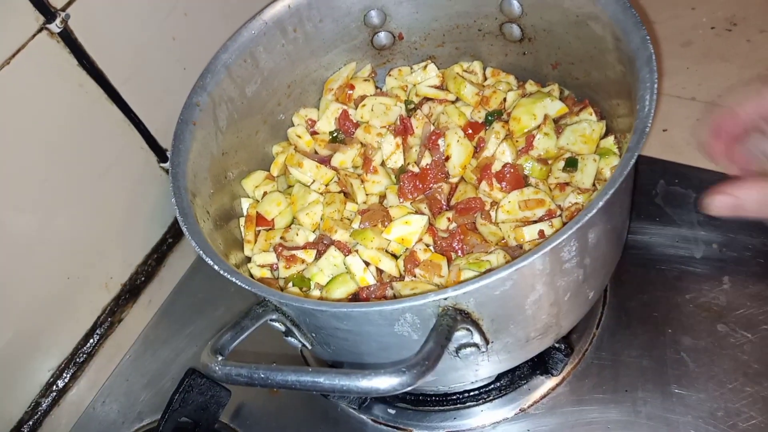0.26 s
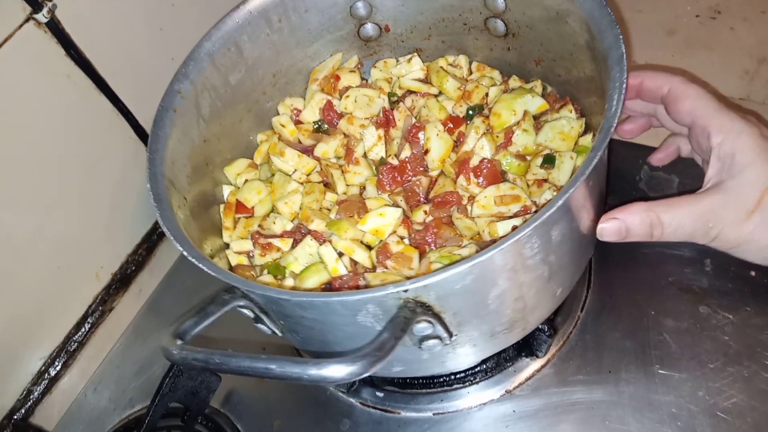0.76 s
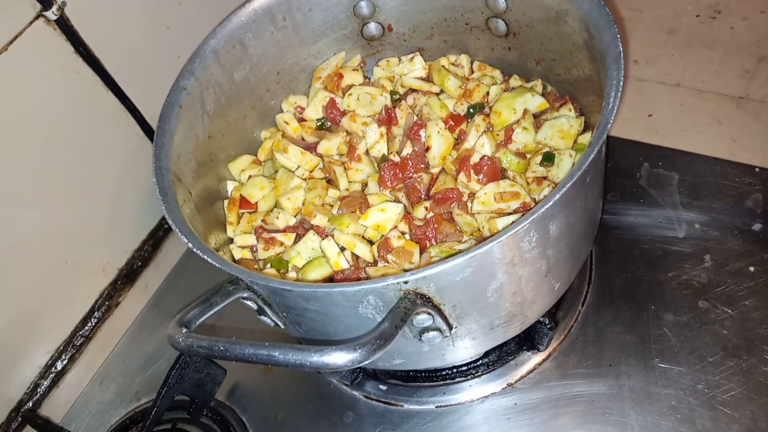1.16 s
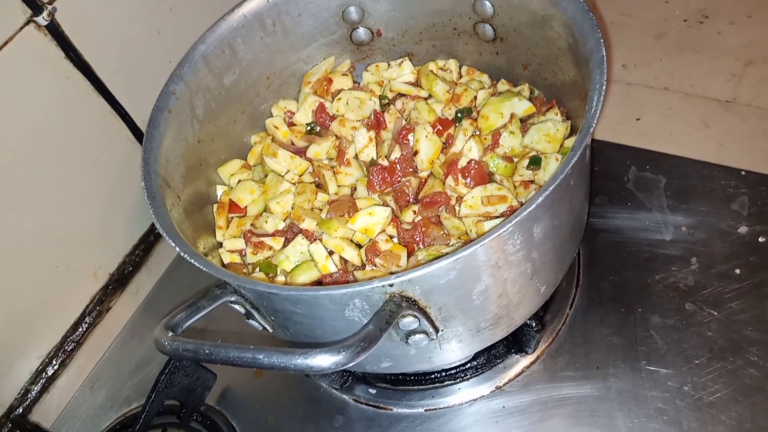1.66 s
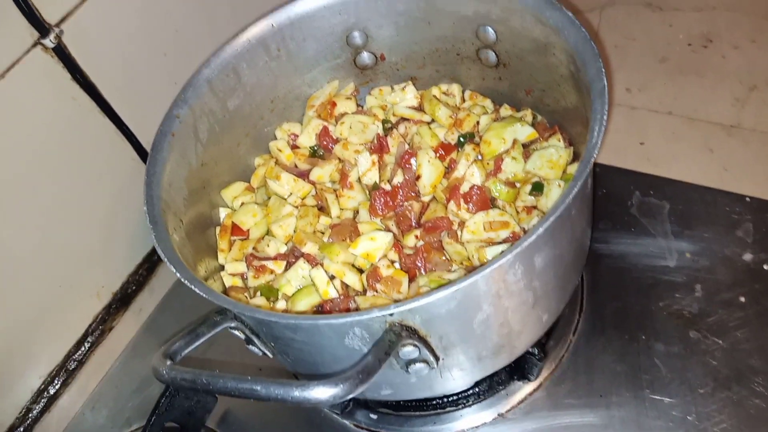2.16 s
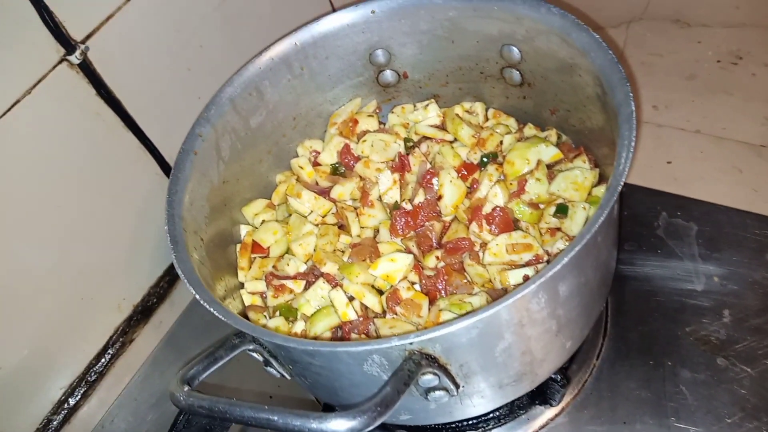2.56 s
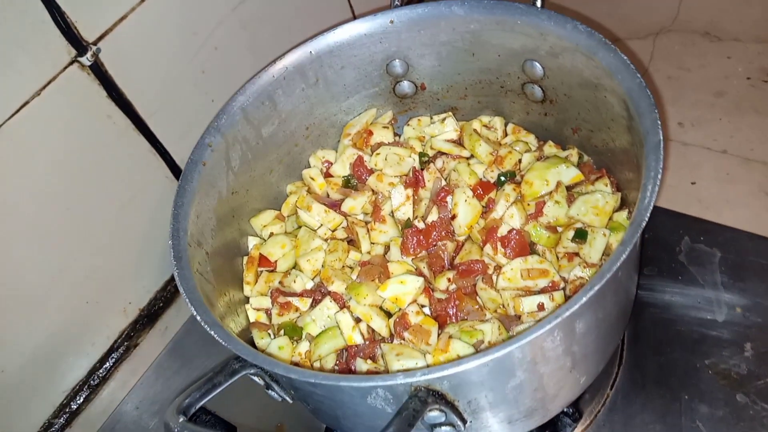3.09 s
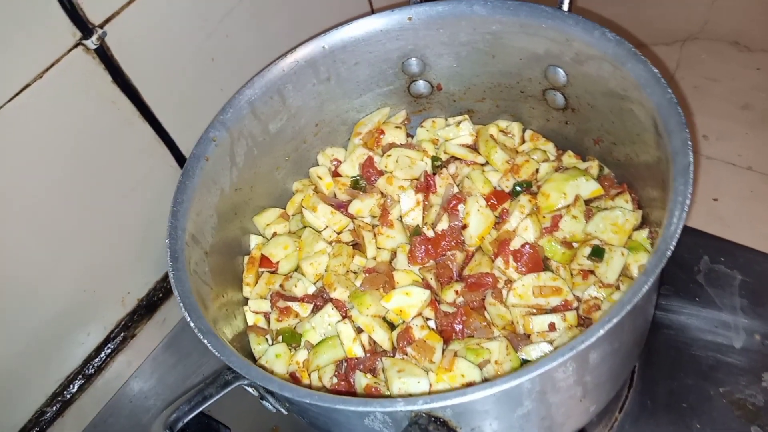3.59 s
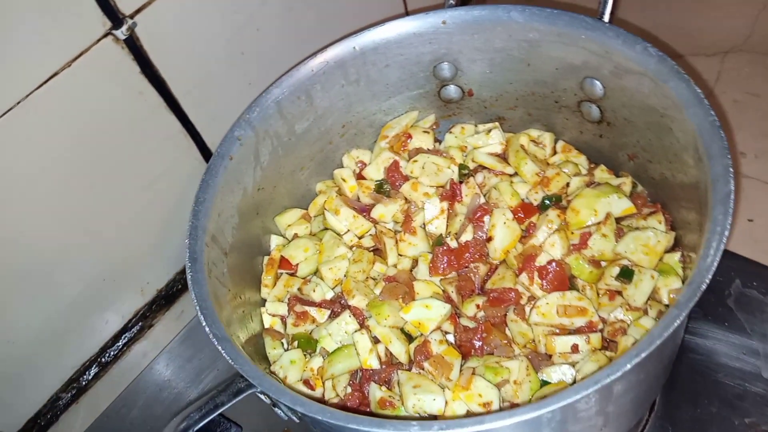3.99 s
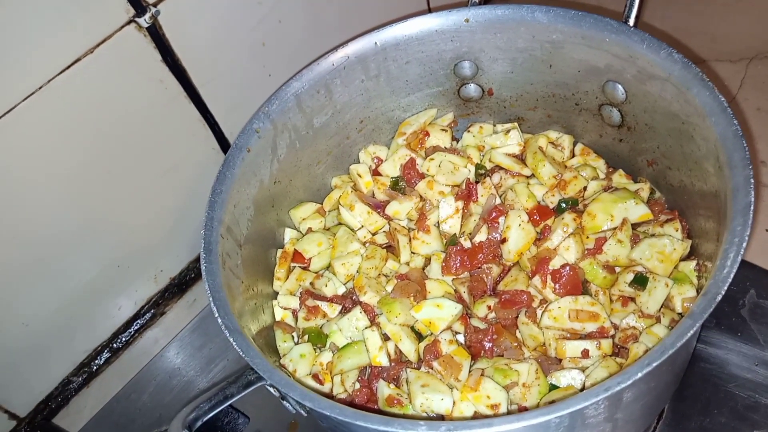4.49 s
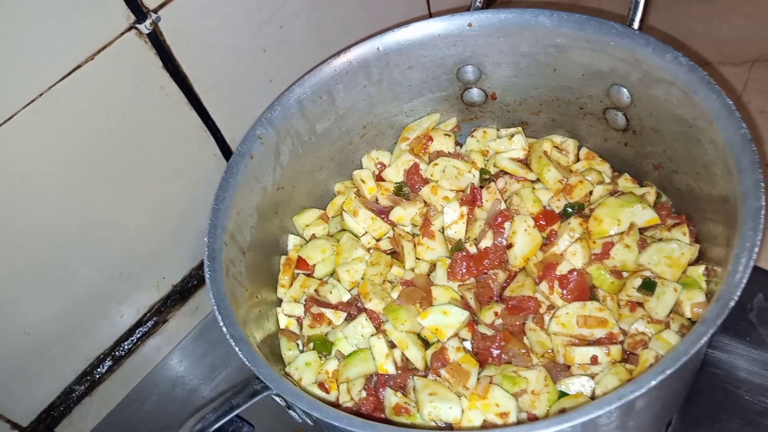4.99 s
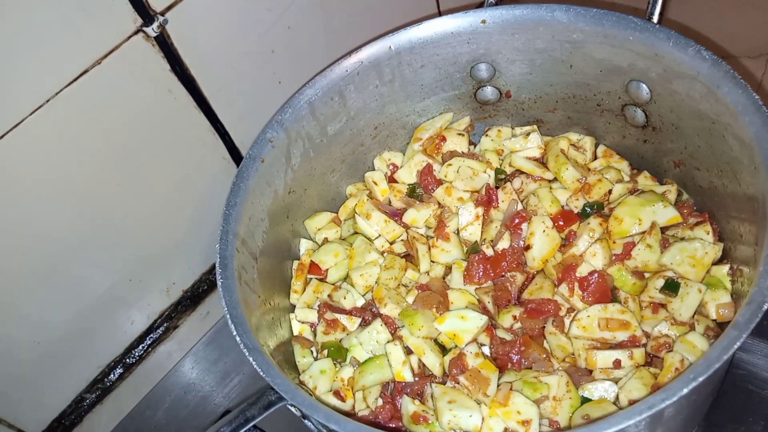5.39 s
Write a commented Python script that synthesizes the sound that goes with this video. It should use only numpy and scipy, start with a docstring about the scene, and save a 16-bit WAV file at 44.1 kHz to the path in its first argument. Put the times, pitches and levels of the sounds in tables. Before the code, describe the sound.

A faint, fine sizzle from vegetables cooking in a metal pot, with close handling adding light ticks, dull knocks and brief metallic scrapes.

```python
"""Chopped vegetables sizzle faintly in a metal pot over a low gas flame.
Countless tiny steam bursts superpose into a fine hiss and excite the air modes of the open pot.
There is one brief squeak; later a faint tone swells. Close by, handling adds dull rustles, a low rumble,
ticks, soft bumps, drags of skin and short rubs that leave the metal ringing.
One microphone, with a thin hiss of its own, feeds both channels."""
import sys
import numpy as np
from scipy.fft import rfft, irfft, next_fast_len
from scipy.io import wavfile

SR = 44100
rng = np.random.default_rng(int(sys.argv[2]) if len(sys.argv) > 2 else 0)


def inscribe(sig):
    """Save sig as 16-bit PCM at rate SR to the path in sys.argv[1].

    A 1-D sig is mono; a 2-D sig holds one channel per row.
    Samples are clipped to [-1, 1] before scaling.
    """
    pcm = np.round(np.clip(np.atleast_2d(sig).T, -1, 1) * 32767)
    wavfile.write(sys.argv[1], SR, pcm.astype(np.int16))


N = 249144
TIME = np.arange(N) / SR
SIZE = next_fast_len(N)
FREQS = np.maximum(np.fft.rfftfreq(SIZE, 1 / SR), 1)

# spectrum of steam bursts heard through the food: frequency_hz, gain_db
BURST_SPECTRUM = [(450, -30), (700, -12.5), (950, -8.5), (1200, -5), (1750, -4.5), (2300, -3.5),
                  (2800, -0.5), (3600, 1.5), (4900, -2), (5900, -3), (7000, -8), (7900, -13.5), (9300, -11),
                  (11500, -16), (14000, -22)]
# upper modes of the handled body: pitch_hz, width_hz, gain_db
KNOCK_MODES = [(322, 28, 12), (388, 28, 10.5), (650, 180, -1)]


def from_db(db):
    """Decibels to amplitude ratio."""
    return 10 ** (np.asarray(db) / 20)


def rms_one(x):
    """Normalisation to unit power."""
    return x / np.sqrt(np.mean(x ** 2) + 1e-20)


def drift(rate_hz):
    """Random fluctuation: noise low-passed at rate_hz, with a spread near 1."""
    rolloff = 1 + (np.fft.rfftfreq(4096, 1 / 400) / rate_hz) ** 2
    slow = irfft(rfft(rng.standard_normal(4096)) / rolloff)
    return np.interp(TIME, np.arange(4096) / 400, rms_one(slow))


def colour(points):
    """Spectral envelope through (frequency_hz, gain_db) points."""
    hz, db = np.transpose(points)
    return from_db(np.interp(np.log(FREQS), np.log(hz), db))


def resonances(modes):
    """Response of damped resonators (pitch_hz, width_hz, gain_db) whose powers add."""
    return np.sqrt(sum(from_db(db) ** 2 / (1 + ((FREQS ** 2 - hz ** 2) / (FREQS * width)) ** 2)
                       for hz, width, db in modes))


def shaped(x, gain):
    """Linear filtering by a gain per frequency; rms 1."""
    return rms_one(irfft(rfft(x, SIZE) * gain, SIZE)[:N])


def noise(gain):
    """Filtered Gaussian noise; rms 1."""
    return shaped(rng.standard_normal(N), gain)


def tone(hz, wander_hz, rate_hz=45):
    """Oscillation with random frequency modulation; rms 1."""
    return np.sqrt(2) * np.sin(2 * np.pi * np.cumsum(hz + wander_hz * drift(rate_hz)) / SR)


def grains(per_s, spread_db):
    """Shot noise: impulses at random moments; spread_db makes a few of them larger."""
    sizes = from_db(spread_db * np.minimum(rng.exponential(1, N), 5)) * rng.choice([-1, 1], N)
    return sizes * (rng.random(N) < per_s / SR)


def swell(middle_s, spread_s):
    """Gaussian envelope."""
    return np.exp(-.5 * ((TIME - middle_s) / spread_s) ** 2)


def blow(start_s, t60_s, rise_s):
    """Envelope of a damped vibration: a quick rise, then exponential decay."""
    age = np.maximum(TIME - start_s, 0)
    return (1 - np.exp(-age / rise_s)) * from_db(-60 * age / t60_s)


def power_sum(envelopes):
    """Incoherent addition: the squares of the amplitudes add."""
    return np.sqrt(sum(envelope ** 2 for envelope in envelopes))


def reflected(x, sway=0.0405):
    """Comb filtering: near echoes interfere, their delays wandering as the microphone moves; rms 1."""
    # first reflections from pot wall, stove and tiles: delay_s, gain_db
    paths = [(.0019, -14.5), (.0034, -17), (.0052, -16), (.0081, -18), (0.0125, -22.5), (.019, -22.5)]
    echoes = 0
    for delay, db in paths:
        departure = TIME - delay * (1 + sway * drift(0.195))
        echoes += from_db(db) * np.interp(departure, TIME, x, left=0)
    return rms_one(x + echoes)


def sizzle(vigour_db, tilt_db, bursts_per_band_s=9000, sputter_db=0.26, patchy_db=0.67):
    """Superposition of steam bursts: each size fills its own band at an unsteady level; rms 1."""
    edges_hz = np.geomspace(400, 16000, 13)
    spectrum, sputter, bursts = colour(BURST_SPECTRUM), drift(9.4), 0
    for low, high in zip(edges_hz, edges_hz[1:]):
        band = spectrum * (FREQS >= low) * (FREQS < high)
        octaves = np.log2(low / 3700)
        follow = np.clip(1 - 0.55 * octaves ** 2, .3, 1)  # middle sizes follow the heat most closely
        trend_db = follow * vigour_db + tilt_db * np.clip(octaves, -1, 1)
        activity = from_db(trend_db + sputter_db * sputter + patchy_db * drift(13.0))
        pops = shaped(grains(bursts_per_band_s, spread_db=2.0), band)
        bursts += np.sqrt(np.sum(band ** 2)) * activity * pops
    return reflected(bursts)


def crackle(level_db=-64):
    """Sparse shot noise: bursts near the surface stand out as fine, sharp pricks."""
    return from_db(level_db) * shaped(grains(per_s=260, spread_db=0.5), colour(BURST_SPECTRUM))


def pot_air(vigour_db, level_db=-59, follow=0.57, wander=.012, waver_db=1.5):
    """Cavity resonance: bursts ring the air in the pot; rising steam makes pitch and strength waver."""
    # air modes of the open pot: pitch_hz, width_hz, gain_db
    air_modes = [(526, 14, -7), (627, 10, -1.5), (673, 8.6, -3), (863, 99, -6.5), (1074, 49, 5),
                 (1471, 33, -2.5), (1950, 89, -6), (2483, 100, -0.5), (2850, 67, -5.5), (3610, 340, -6.5)]
    response = resonances(air_modes) / (1 + (450 / FREQS) ** 4)
    air = shaped(grains(per_s=1500, spread_db=2.5), response)
    warped_time = TIME + np.cumsum(wander * drift(9)) / SR
    strength = from_db(level_db + follow * vigour_db + waver_db * drift(3.6))
    return strength * np.interp(warped_time, TIME, air)


def flame(level_db=-73, flutter_db=2.0):
    """Combustion noise: a low, slightly unsteady rush of burning gas."""
    # spectrum of the flame: frequency_hz, gain_db
    flame_spectrum = [(20, -26), (42, -16), (65, 0.5), (90, 3.5), (118, -3.5), (148, 2), (200, -4.5),
                      (270, -8.5), (340, -2), (460, -7), (800, -11.5), (2000, -21)]
    return from_db(level_db + flutter_db * drift(5.9)) * noise(colour(flame_spectrum))


def rustles(light_db=-73.5, hollow_hz=545, width_hz=70):
    """Muffled friction noise: a light touch sounds hollow, a harder one excites the knock modes."""
    # sliding touches: middle_s, relative_db, spread_s
    touches = [(0.303, -78, 0.23), (0.998, -76, 0.028), (1.317, -76, 0.19), (1.957, -74, 0.05),
               (2.51, -74, 0.028), (2.768, -72, 0.043), (3.13, -73, .035), (3.69, -61.5, 0.17),
               (4.065, -72, 0.11), (4.332, -67.5, 0.065), (4.531, -65.5, 0.029), (5.338, -64.5, 0.029),
               (5.55, -56.5, 0.078)]
    # spectrum of their friction: frequency_hz, gain_db
    dull_spectrum = [(120, -25), (260, -14), (330, 5), (430, 2.5), (510, -3), (620, 2.5), (850, -2),
                     (1300, -10.5), (2500, -39)]
    dull = noise(colour(dull_spectrum))
    knock = noise(resonances(KNOCK_MODES) / (1 + (FREQS / 800) ** 4))
    hollow = noise(resonances([(hollow_hz, width_hz, 0)]) ** 2)
    out = 0
    for middle, db, spread in touches:
        force_db = db - light_db
        ringing = from_db(3 - 0.93 * force_db) * hollow + from_db(-11 + 0.53 * force_db) * knock
        out += from_db(db) * swell(middle, spread) * (dull + ringing)
    return out


def pushes(rumble_hz=76, width_hz=67):
    """Slow forcing stirs only the lowest resonance, heard as a rumble."""
    # slow pushes: middle_s, level_db, spread_s
    presses = [(0.68, -73, 0.044), (2.6, -73, .04), (2.72, -67.5, 0.045), (3.24, -65.5, 0.032),
               (4.77, -64, .014)]
    force = sum(from_db(db) * swell(middle, spread) for middle, db, spread in presses)
    return force * noise(resonances([(rumble_hz, width_hz, 0)]) ** 2)


def ticks(rise_share=0.047):
    """Damped transients: each light contact is a short band of noise around its own pitch."""
    # light contacts: start_s, level_db, pitch_hz, width_hz, t60_s
    contacts = [(0.6875, -44, 9000, 15000, .014), (0.7335, -35, 5940, 2200, .026),
                (0.741, -46, 6500, 4500, 0.067), (0.796, -41, 15300, 2200, .03),
                (1.035, -40, 4800, 2500, .034), (2.729, -53.5, 540, 420, 0.11),
                (3.11, -51, 11000, 5000, .07), (3.148, -48.5, 1550, 1000, 0.15)]
    out = 0
    for start, db, hz, width, t60 in contacts:
        envelope = from_db(db) * blow(start, t60, rise_share * t60)
        out += envelope * noise(resonances([(hz, width, 0)]) ** 2)
    return out


def bumps(gain_db=5.5, rise_s=0.012, t60_s=0.24, soft_hz=650, rattle_db=-5):
    """Impact excitation: soft contacts ring the body's modes; the hand's padding keeps the treble out."""
    # soft contacts: start_s, relative_db, knock_over_thud_db
    impacts = [(0.738, -60, 4), (0.764, -62, 8.5), (0.79, -70, 18.5), (0.828, -66, 8), (0.872, -74, 14),
               (1.465, -67, -20), (2.722, -67.5, 8), (2.765, -65, -11), (2.82, -63, -12), (2.99, -67, -26),
               (3.16, -67.5, 3), (3.225, -72, -1), (4.205, -64.5, 1), (4.235, -63, -5), (4.76, -71, -2.5)]
    # low modes of the bumped body: pitch_hz, width_hz, gain_db
    thud_modes = [(80, 95, -6), (148, 45, 0), (225, 70, -28)]
    soft = 1 / (1 + (FREQS / soft_hz) ** 4) / (1 + (45 / FREQS) ** 4)
    thud_envelope = sum(from_db(db) * blow(start, t60_s, rise_s) for start, db, _ in impacts)
    knock_envelope = power_sum(from_db(db + knock_db) * blow(start, t60_s, rise_s)
                               for start, db, knock_db in impacts)
    ring = rms_one(sum(from_db(db) * tone(hz, wander_hz=22, rate_hz=20.6) for hz, _, db in KNOCK_MODES))
    rattle = from_db(rattle_db) * noise(soft * resonances(KNOCK_MODES))
    thud = noise(soft * resonances(thud_modes))
    return from_db(gain_db) * (thud_envelope * thud + knock_envelope * rms_one(ring + rattle))


def drags(catch_db=1.5, catch_hz=25, stop_s=.02):
    """Stick-slip friction: skin scuffs the body in uneven catches and stops at once on letting go."""
    # drags of skin: start_s, end_s, level_db, rise_s
    slides = [(0.905, 1.045, -66, .02), (3.12, 3.288, -69, .03), (5.382, 5.6, -61.5, 0.056)]
    # spectrum of the scuffing: frequency_hz, gain_db
    scuff_spectrum = [(35, -18), (70, -3), (150, 0.5), (230, -.5), (350, 0), (470, -8), (650, -5),
                      (1100, -24), (2500, -40)]
    force = 0
    for start, end, db, rise in slides:
        build = np.clip((TIME - start) / rise, 0, 1)
        release = np.clip((end - TIME) / stop_s + .5, 0, 1)
        force += from_db(db) * build * release
    return force * from_db(catch_db * drift(catch_hz)) * noise(colour(scuff_spectrum))


def faint_tones():
    """Modulated tones: one brief squeak; later a faint tone swells near the pot's 1470 Hz air mode."""
    # short tones: middle_s, level_db, spread_s, pitch_hz
    tone_swells = [(2.063, -57, 0.023, 2070), (2.997, -65, .06, 1476)]
    return sum(from_db(db) * swell(middle, spread) * tone(hz, wander_hz=24)
               for middle, db, spread, hz in tone_swells)


def rubs(chatter_db=1.5, rasp_db=-9, shimmer_db=-3, linger_db=-10, linger_t60_s=3.6):
    """Friction-induced vibration: tiny slips hiss and make the metal sing; its high modes linger."""
    # dry rubs: middle_s, ring_db, hiss_db, spread_s
    strokes = [(3.153, -57, -60, .02), (4.513, -58, -57.5, 0.014), (4.73, -57, -54, 0.02),
               (4.87, -65, -61, 0.03), (4.965, -68, -64, 0.0074), (5.093, -64, -63, .01),
               (5.418, -45, -56, 0.0071), (5.445, -40, -58, 0.015), (5.485, -45.5, -58, 0.0079),
               (5.545, -69.5, -59, 0.07)]
    # modes of the rubbed metal: pitch_hz, wander_hz, gain_db
    metal_modes = [(1650, 21.2, -10), (2330, 23, -8), (2680, 35, -9), (3030, 32.3, 1.5), (3880, 32, 3.5),
                   (4040, 45, -3.5), (4740, 30, -5), (5270, 47, -17), (5650, 30.4, -7), (11200, 50, -20),
                   (14630, 55, -13), (15150, 200, -18), (15700, 45, -14)]
    # thin high rings: pitch_hz, width_hz, stroke_gain_db, tail_gain_db
    high_modes = [(4750, 38, 5, 4), (5300, 50, 9, -5), (5650, 130, 1, 11), (7840, 40, 2, -13),
                  (9130, 60, 2, -15), (9700, 45, 1, -8), (10500, 350, -10, -2), (11200, 150, -5, -5),
                  (14650, 70, 0, -13), (15600, 70, 6, -9)]
    # spectrum of the friction hiss: frequency_hz, gain_db
    slip_spectrum = [(1000, -4.5), (2500, 1), (5500, 0), (7200, 12), (8200, -13), (9200, -2.5),
                     (11500, -2.5), (13700, -7), (15200, 3), (16000, -14)]
    slips = grains(per_s=3000, spread_db=0)
    shimmer = shaped(slips, resonances([(hz, width, db) for hz, width, db, _ in high_modes]))
    tail = noise(resonances([(hz, width, db) for hz, width, _, db in high_modes]))
    partials = sum(from_db(db + chatter_db * drift(90)) * tone(hz, wander)
                   for hz, wander, db in metal_modes)
    rasp = shaped(slips, resonances([(hz, 220, db) for hz, _, db in metal_modes]))
    singing = rms_one(rms_one(partials) + from_db(rasp_db) * rasp)
    friction = shaped(slips, colour(slip_spectrum)) + from_db(shimmer_db) * shimmer
    ring_envelope = power_sum(from_db(db) * swell(middle, spread) for middle, db, _, spread in strokes)
    hiss_envelope = power_sum(from_db(db) * swell(middle, spread) for middle, _, db, spread in strokes)
    tail_envelope = power_sum(from_db(db + linger_db) * blow(middle, linger_t60_s, rise_s=.01)
                              for middle, _, db, _ in strokes)
    return ring_envelope * singing + hiss_envelope * friction + tail_envelope * tail


def pings():
    """Free vibration: a light scrape leaves the metal ringing thinly."""
    # decaying partials: start_s, level_db, pitch_hz, t60_s
    thin_rings = [(4.73, -57.5, 4755, .7), (4.725, -63, 9050, .5)]
    return sum(from_db(db) * blow(start, t60, rise_s=.012) * tone(hz, wander_hz=14)
               for start, db, hz, t60 in thin_rings)


def scene(sizzle_gain_db=0.38):
    """Superposition of the cooking and the handling near it, alike in both channels."""
    # course of the slowly easing sizzle: time_s, relative_db, tilt_db_per_octave
    sizzle_course = [(0.0, -46.5, 2.5), (0.15, -47, 0.5), (1.07, -48.5, 1), (1.31, -50, 0.5),
                     (1.83, -48.5, 0), (2.14, -51, 0.5), (2.32, -50, 0.5), (4.78, -51.5, 0),
                     (5.17, -53, 0.5), (5.35, -49.5, 0.5)]
    time_s, *columns = np.transpose(sizzle_course)
    level_db, tilt_db = [np.interp(TIME, time_s, column) for column in columns]
    mean_db = np.mean(level_db)
    vigour_db = level_db - mean_db
    sizzling = from_db(mean_db + sizzle_gain_db) * sizzle(vigour_db, tilt_db)
    cooking = sizzling + crackle() + pot_air(vigour_db) + faint_tones() + flame()
    handling = bumps() + drags() + pushes() + rustles() + rubs() + pings() + ticks()
    return np.array([cooking + handling] * 2)


def record(dry, hiss_db=-59.5, waver_db=1.9, cutoff_hz=15760):
    """Self-noise and band limiting: the microphone adds a wavering hiss; the top is cut steeply."""
    # microphone hiss, topped by the resonance of its port: frequency_hz, gain_db
    hiss_spectrum = [(500, -22.5), (9000, -14), (12500, -15), (13800, -21), (14300, -10), (14850, -1.5),
                     (15800, -6)]
    hiss = from_db(hiss_db + waver_db * drift(12)) * noise(colour(hiss_spectrum))
    passband = np.clip((cutoff_hz - FREQS) / 150 + .5, 0, 1)
    return irfft(rfft(dry + hiss, SIZE) * passband, SIZE)[:, :N]


dry = scene()
out = record(dry)
inscribe(out)
```